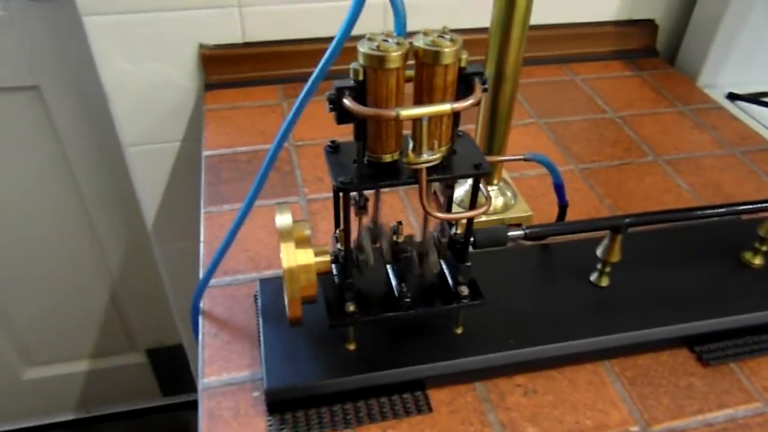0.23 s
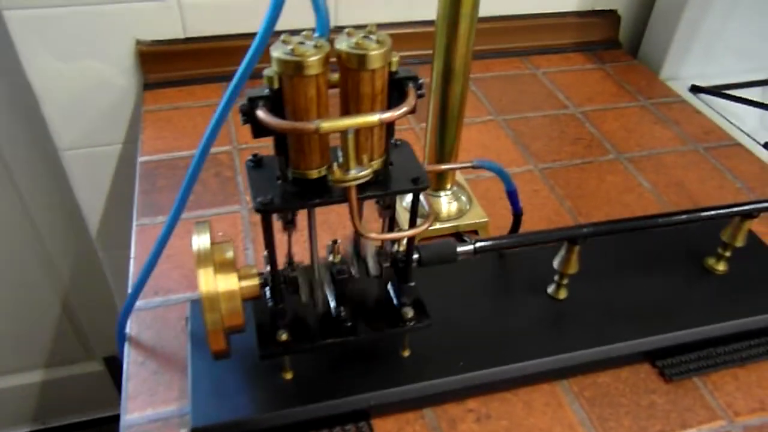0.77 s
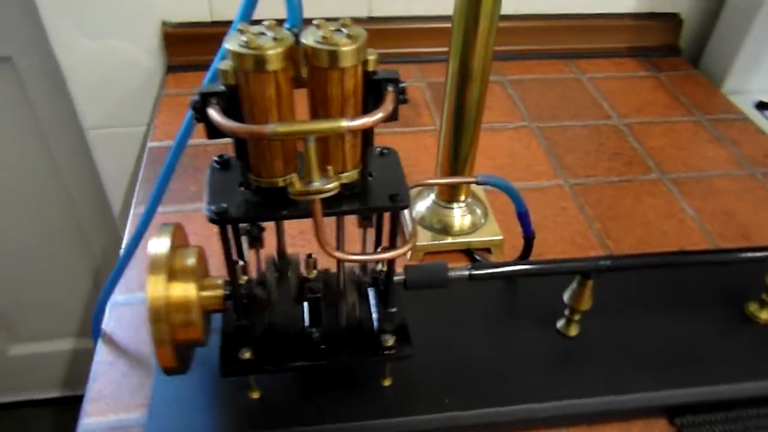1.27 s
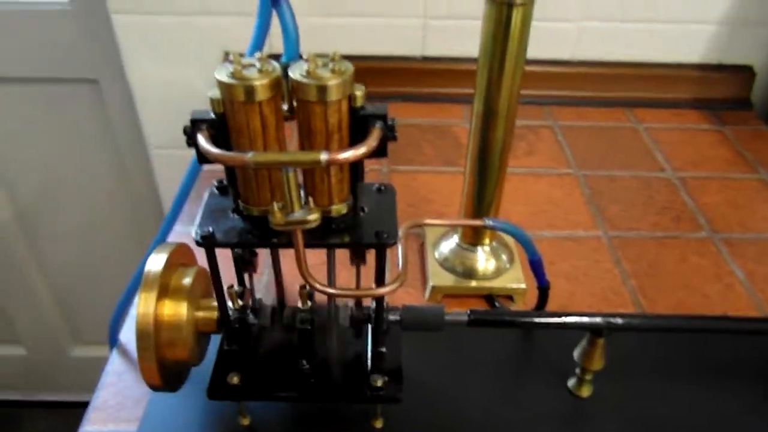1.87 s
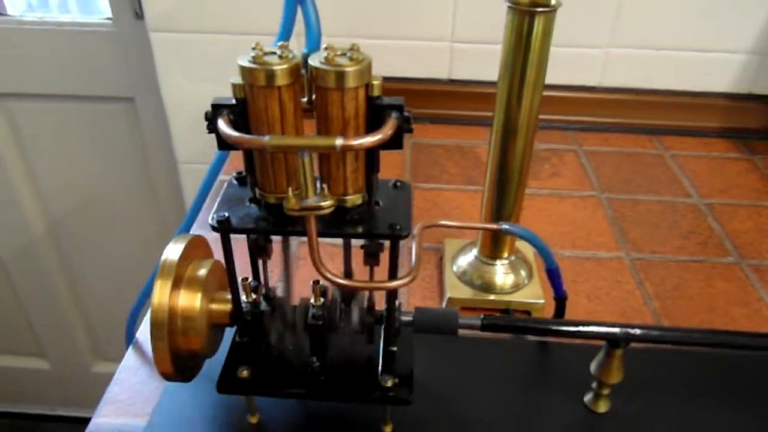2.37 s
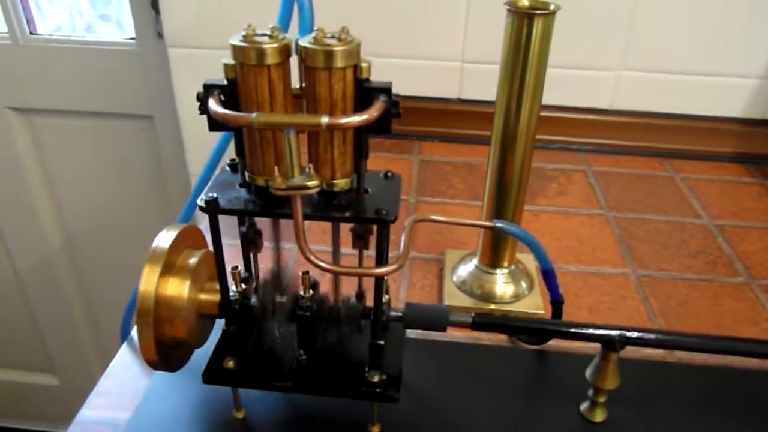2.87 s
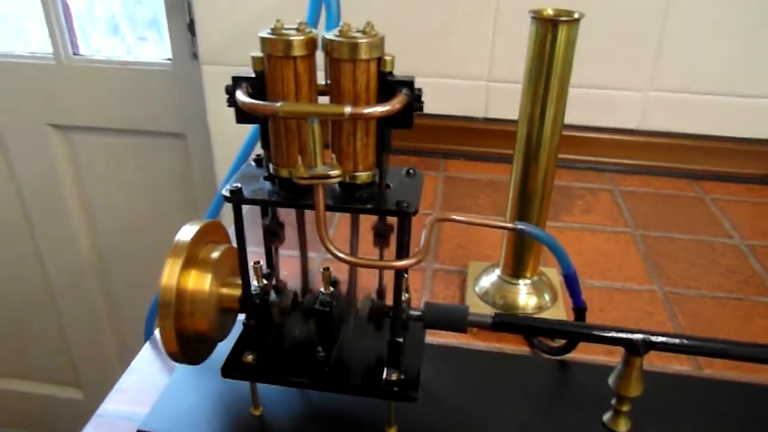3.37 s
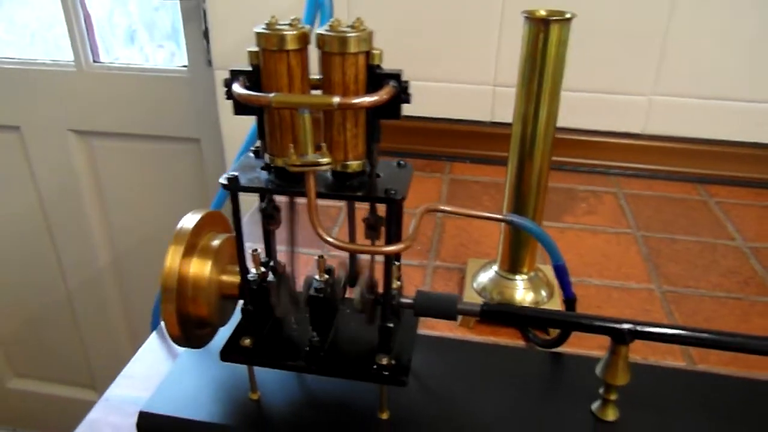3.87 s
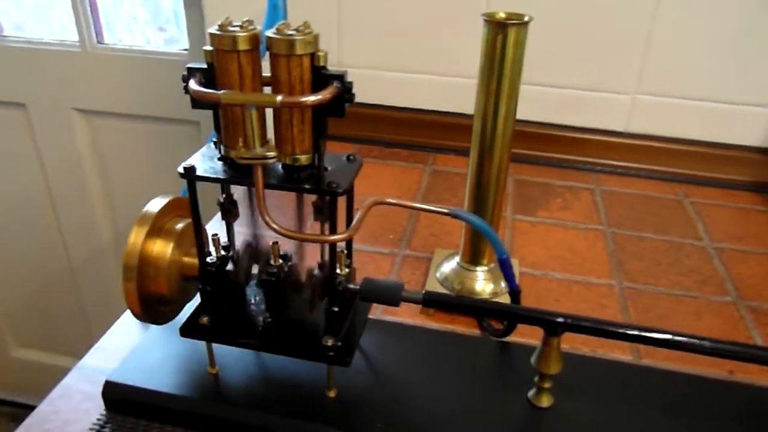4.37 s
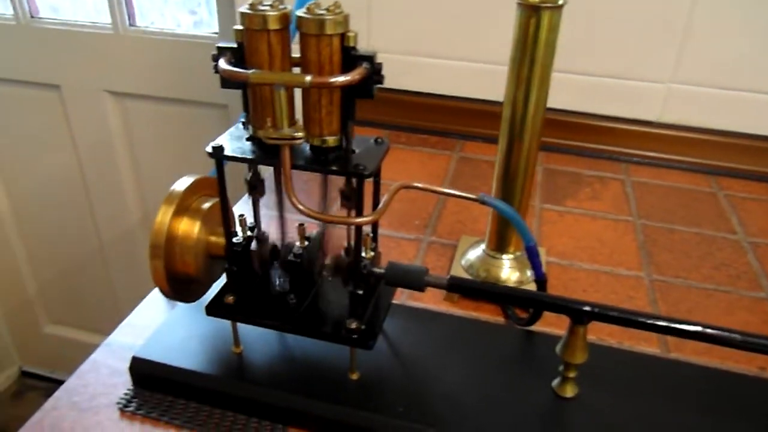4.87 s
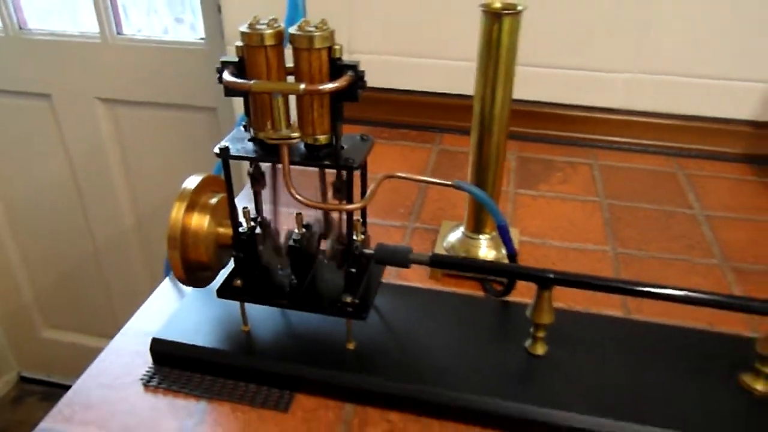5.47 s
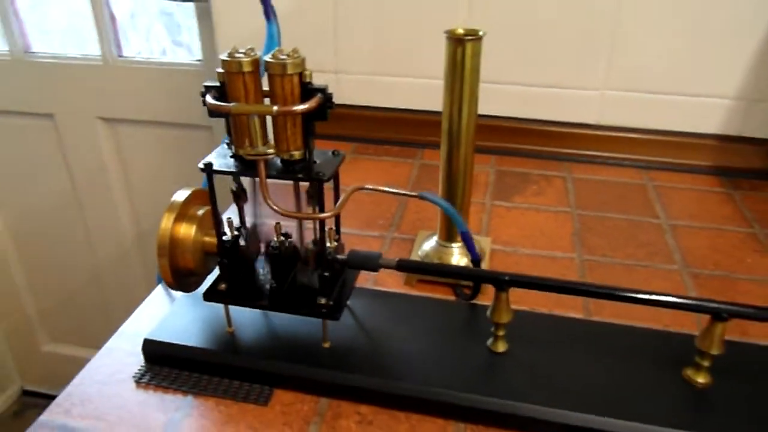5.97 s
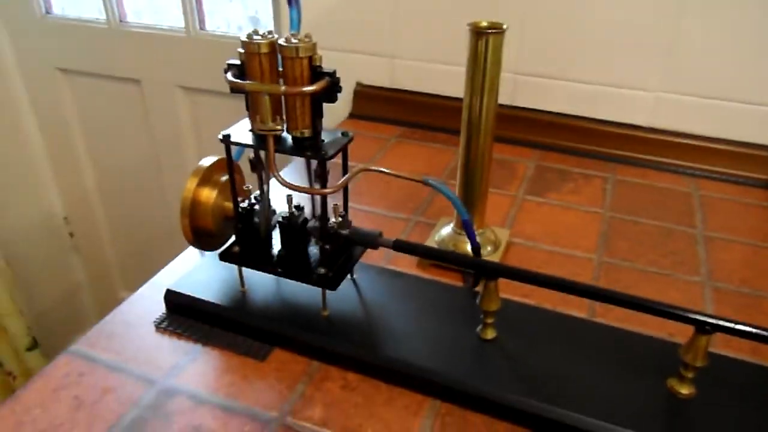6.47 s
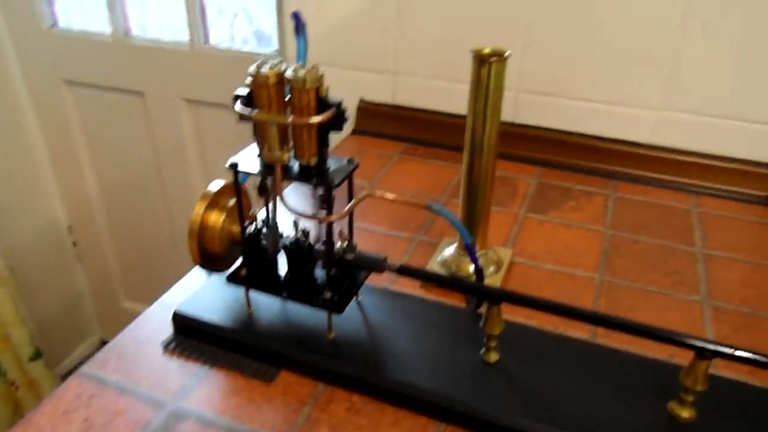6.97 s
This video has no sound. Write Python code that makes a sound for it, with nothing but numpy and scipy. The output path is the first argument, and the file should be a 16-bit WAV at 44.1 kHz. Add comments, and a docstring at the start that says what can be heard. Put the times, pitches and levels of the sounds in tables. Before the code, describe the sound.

A small model twin-cylinder engine rattles quickly and steadily, metallic knocks alternating with raspy, whistling air puffs, then sags briefly and picks up with a scrape.

```python
"""Small steam engine on a table

A model twin-cylinder steam engine runs on compressed air in a tiled room, close to a hand-held camera.
Once a turn the slack in its linkage rattles in a run of noise bursts, with fading sine rings and low pops.
Between the knocks the exhaust rasps, whistles and throbs: shaped noise, warbling tones and gliding puffs.
Near the end the engine slows, then picks up again with a light scrape of ringing noise."""
import sys
import numpy as np
from scipy import signal
from scipy.fft import rfft, irfft
from scipy.io import wavfile

SR = 44100
rng = np.random.default_rng(int(sys.argv[2]) if len(sys.argv) > 2 else 0)


def bounce(signal):
    """Save signal as a 16-bit WAV file at the path given by the first command-line argument."""
    frames = np.transpose(np.atleast_2d(signal))
    limited = np.clip(frames, -1, 1)
    pcm = np.round(limited * 32767).astype(np.int16)
    wavfile.write(sys.argv[1], SR, pcm)


N = 318402
TIME = np.arange(N) / SR
FULL_SPEED = 8.7  # turns per second

# Crank speed. Each row: time in seconds, speed in turns per second.
SPEED = [(0, 8.703), (2.1, 8.667), (4.3, 8.708), (5, 8.745), (5.6, 8.718), (5.8, 8.577), (6.13, 7.569),
         (6.4, 7.81), (7.22, 8.316)]
# Strength of the air flow. Each row: time in seconds, relative level in dB.
AIR_LEVEL = [(0, -25.4), (1, -25), (2.8, -25), (4.1, -26), (5.45, -25.5), (5.85, -27), (6.7, -27),
             (7.2, -25.5)]
# Tone colour of the metalwork, also used for the hiss. Each row: frequency in Hz, relative level in dB.
METAL = [(40, -27), (150, -11), (500, -14), (1100, -11), (1700, 4.5), (2200, 0), (2800, 0.5), (3900, -4.5),
         (4700, -4.5), (6500, 1.5), (9000, -2), (11500, -6.5)]


def gain_of(db):
    """Turns decibels into a factor."""
    return 10 ** (np.asarray(db) / 20)


def evened(x):
    """Scales a signal to an rms (average strength) of 1."""
    return x / np.sqrt(np.mean(x ** 2) + 1e-20)


def read(points, hz):
    """Reads a spectrum between its points on a log-frequency axis."""
    f, value = np.transpose(points)
    return np.interp(np.log(hz + 1), np.log(f + 1), value)


def curve(rows, column):
    """Joins one column of a table by straight lines in time."""
    rows = np.asarray(rows)
    return np.interp(TIME, rows[:, 0], rows[:, column])


def add(mix, s, sound):
    """Mixes a sound in at a time in seconds."""
    part = mix[max(round(s * SR), 0):][:len(sound)]
    part += sound[:len(part)]


def coloured(x, spectrum, rings=(), size=8192):
    """Passes x through a body of unit energy with a broad spectrum and ringing peaks."""
    hz = abs(np.fft.fftfreq(size, 1 / SR))
    db = read(spectrum, hz)
    for f, width, boost in rings:
        db = db + boost / (1 + (2 * (hz - f) / width) ** 2)
    # minimum phase: the body answers only after it is struck
    phased = np.exp(np.conj(signal.hilbert(np.log(gain_of(db)))))
    response = np.fft.ifft(phased).real[:size // 2]
    return signal.oaconvolve(x, response / np.linalg.norm(response))[:N]


def wander(rate_hz):
    """Smooth random movement with an rms of 1; a higher rate moves faster."""
    hz = np.fft.rfftfreq(N, 1 / SR)
    smooth = rfft(rng.standard_normal(N)) * np.exp(-(hz / rate_hz) ** 2)
    return evened(irfft(smooth, N))


def swell(t, peak_s):
    """A rise to 1 at peak_s and a fall after it."""
    return t / peak_s * np.exp(1 - t / peak_s)


def crank(first_knock_s=.0014):
    """Adds up the speed into turns made so far; each whole number is a knock."""
    return np.cumsum(curve(SPEED, 1)) / SR - first_knock_s * FULL_SPEED


def sag(s):
    """Turns per second below full speed at a time."""
    return FULL_SPEED - np.interp(s, *np.transpose(SPEED))


def passes(angle, share):
    """The times at which the crank passes one point of its turn."""
    return TIME[1:][np.diff(np.floor(angle - share)) > 0]


def knocking(angle, uneven_db=.5):
    """One knock a turn, each a little different: rows of seconds and dB."""
    # Strength of the knock before its chance part. Each row: time in seconds, relative level in dB.
    knock_level = [(0, -22), (.7, -20), (2, -20), (4.2, -20.5), (5.4, -22), (5.95, -24), (6.2, -21.5),
                   (7.2, -21.5)]
    s = passes(angle, 0)
    db = np.interp(s, *np.transpose(knock_level)) + uneven_db * rng.standard_normal(len(s))
    return np.column_stack([s, db])


def dispersed(x, delay_s=0.0005):
    """In metal the high bending waves outrun the low ones; delay_s is the travel time at 4 kHz."""
    hz = np.fft.rfftfreq(N, 1 / SR)
    return irfft(rfft(x) * np.exp(-4j * np.pi * delay_s * np.sqrt(4000 * hz)), N)


def rattle(angle, knocks, level_db=21.5, stretch=.05, jitter_s=.0001, ticks_db=-1,
           chatter=1.8, chatter_s=0.00059):
    """The linkage takes up its slack in a quick run of blows; the valve gear ticks in between."""
    # The blows within one knock. Each row: delay in seconds before chance shifts, relative level in dB.
    blow_rows = [(.0002, 2), (.0009, -3.5), (.0024, 3), (.0037, 7), (.0046, -1), (.006, -4), (.0081, 3.5),
                 (0.0107, -1)]
    # Valve gear ticks. Each row: share of a turn, relative level in dB.
    tick_rows = [(0.286, -5.5), (0.361, -6.5), (0.496, -5.5), (0.889, -11)]
    # Resonances of the struck metal. Each row: frequency in Hz, width in Hz, boost in dB.
    metal_rings = [(4544, 120, 11), (4980, 250, 10), (5884, 156, 7.5), (6290, 190, 4.5), (6700, 105, 9.5),
                   (8150, 330, 2), (10030, 680, 5.5)]
    blows, t = np.zeros(N), np.arange(SR // 200) / SR

    def strike(at, db):
        """Loose metal chatters for an instant after the first contact."""
        contact = rng.standard_normal(len(t)) * np.exp(-t / chatter_s)
        contact = chatter * contact / np.linalg.norm(contact)
        contact = contact + (t == 0)  # the first contact is a single click
        add(blows, at, gain_of(db) * contact / np.linalg.norm(contact))

    for s, knock_db in knocks:
        pace = 1 + stretch * rng.standard_normal()
        for delay, db in blow_rows:
            at = s + delay * pace + jitter_s * rng.standard_normal()
            strike(at, level_db + knock_db + db)
    for share, db in tick_rows:
        for at in passes(angle, share):
            strike(at, ticks_db + db)
    return dispersed(coloured(blows, METAL, metal_rings))


def frame(knocks, ring_db=-3, ring_s=0.0055, ring_spread=0.026,
          rebound_db=-5, rebound_s=.0075, rebound_drop=0.02,
          board_s=0.0027, board_spread=0.033, uneven_db=1.0, table_hz=212, table_s=0.005):
    """Each knock rings the frame, the baseboard and the table as swelling, fading sines."""
    # Low rings under each knock, changing over time; the table is weaker once the engine slows.
    # Each row: time in seconds, middle baseboard pitch in Hz,
    # baseboard level and table level in dB against the knock.
    board_rows = [(0, 510, -6, -18), (2, 510, -8.5, -18.5), (3.5, 507, -6, -18.5), (5.4, 508, -3.5, -18),
                  (6.1, 534, -4, -29), (7.2, 537, -1.5, -22)]
    # Middle pitch of the frame's ring. Each row: time in seconds, pitch in Hz.
    ring_pitch = [(0, 1692), (1.1, 1795), (2.3, 1737), (3.1, 1880), (3.6, 1793), (4.1, 1935), (5, 1883),
                  (6, 1750), (7.2, 1720)]
    out, t = np.zeros(N), np.arange(SR // 16) / SR
    when, *below = np.transpose(board_rows)
    for s, knock_db in knocks:
        board_hz, board_db, table_db = (np.interp(s, when, column) for column in below)
        board_hz *= 1 + board_spread * rng.standard_normal()
        board_db += uneven_db * rng.standard_normal()
        hz = np.interp(s, *np.transpose(ring_pitch)) * (1 + ring_spread * rng.standard_normal())
        ring = gain_of(ring_db) * swell(t, ring_s) * np.sin(2 * np.pi * (hz * t + rng.random()))
        board = gain_of(board_db) * swell(t, board_s) * np.sin(2 * np.pi * board_hz * t)
        table = gain_of(table_db) * swell(t, table_s) * np.sin(2 * np.pi * table_hz * t)
        add(out, s, gain_of(knock_db) * (ring + board + table))
        # the rebound rings a little lower, so each knock ends in a falling note
        low_hz = hz * (1 - rebound_drop)
        rebound = swell(t, ring_s) * np.sin(2 * np.pi * (low_hz * t + rng.random()))
        add(out, s + rebound_s, gain_of(knock_db + rebound_db) * rebound)
    return out


def pops(knocks, level_db=23, usual_db=-52, spread_db=9, sag_db=16, width_s=0.00011, delay_s=0.0039):
    """A short low pop follows each knock, mostly faint, fainter at low speed, now and then strong."""
    # Pops of set size, given to the nearest knock. Each row: time in seconds, relative level in dB.
    pop_rows = [(.69, -31.5), (.92, -41), (3.46, -36), (3.92, -31.5), (4.26, -29.5), (4.38, -40),
                (4.83, -39), (4.95, -37), (5.52, -39)]
    out, t, times = np.zeros(N), np.arange(SR // 100) / SR, knocks[:, 0]
    sizes_db = usual_db + spread_db * rng.uniform(-1.2, 1, len(times)) - sag_db * sag(times)
    for s, db in pop_rows:
        sizes_db[np.argmin(abs(times - s))] = db
    pulse = -np.exp(-((t - delay_s) / width_s) ** 2 / 2)
    for s, db in zip(times, sizes_db):
        add(out, s, gain_of(level_db + db) * pulse)
    return out


def port_flow(angle):
    """Rise of the air flow, in relative dB, as each port opens and shuts."""
    # Puffs of air in each turn. Each row: share of a turn, half width in turns, relative rise in dB.
    puff_rows = [(.1, 0.084, 2.5), (.425, 0.03, 5), (.61, 0.036, 4), (.79, 0.06, 5), (.92, 0.039, 3)]
    flow_db = np.zeros(N)
    for share, width, db in puff_rows:
        distance = (angle - share + .5) % 1 - .5  # turns from the middle of the puff
        flow_db += db * np.exp(-(distance / width) ** 2 / 2)
    return flow_db


def exhaust(angle, level_db=-0.21, port_depth=0.78, sputter_db=1.48, gust_db=1.0):
    """Air sputters through the ports as they open and shut, and resonates in the pipe."""
    # Tone colour of the exhaust. Each row: frequency in Hz, relative level in dB.
    exhaust_colour = [(70, -45.5), (150, -24), (320, -19.5), (480, -12), (800, -14), (1050, -11),
                      (1400, -10), (1700, -8), (2050, -6.5), (2700, -10), (3100, -11), (4500, -13),
                      (6500, -21), (11500, -21.5)]
    # Pipe resonances. Each row: frequency in Hz, width in Hz, boost in dB.
    pipe_rings = [(1214, 22, 4.8), (1350, 19, 12.6), (1614, 125, 11), (2387, 43, 10), (2697, 96, 11),
                  (2800, 31, 10.5)]
    flow_db = port_depth * port_flow(angle) + sputter_db * wander(280) + gust_db * wander(47)
    air = evened(gain_of(flow_db) * rng.standard_normal(N))
    return coloured(air * gain_of(curve(AIR_LEVEL, 1) + level_db), exhaust_colour, pipe_rings)


def whistle(angle, level_db=-7.5, centre_hz=2560, swing_hz=125, width_hz=90, steepness=2.36,
            gust_db=1.5, speed_power=4):
    """At full flow the ports break into fuzzy, warbling whistles; they fade when the engine slows."""
    flow_db = steepness * port_flow(angle) + gust_db * wander(32)
    speed = curve(SPEED, 1) / FULL_SPEED
    turn = 2 * np.pi * np.cumsum(centre_hz + swing_hz * wander(30.08)) / SR
    # two randomly changing strengths make the tone fuzzy
    tone = wander(width_hz) * np.cos(turn) + wander(width_hz) * np.sin(turn)
    whistles = evened(tone * gain_of(flow_db) * speed ** speed_power)
    return whistles * gain_of(curve(AIR_LEVEL, 1) + level_db)


def leak(angle, level_db=-11, widest=0.12, depth=1.0):
    """A thin hiss escapes at the glands, widest at one point of each turn."""
    opening = 1 + depth * np.cos(2 * np.pi * (angle - widest))
    hiss = rng.standard_normal(N) * opening * gain_of(curve(AIR_LEVEL, 1) + level_db)
    return coloured(hiss, METAL)


def hum(waver=0.34):
    """Faint steady tones under the knocking waver a little in strength and phase."""
    # The tones. Each row: frequency in Hz, relative level in dB.
    tone_rows = [(209, -58), (388, -58), (630, -59.5), (705, -60), (728, -54), (753, -52.5), (777, -54),
                 (801, -55), (1216, -57)]
    # How the tones rise and fall together. Each row: time in seconds, change in dB.
    tone_level = [(0, 1.5), (3, -0.5), (5.5, 2), (6.2, 0), (7.2, -12)]
    out = np.zeros(N)
    for hz, db in tone_rows:
        size, drift = wander(3), wander(3)
        tone = np.sin(2 * np.pi * hz * TIME + waver * drift)
        out += gain_of(db) * np.sqrt(2) * (1 + waver * size) * tone
    return out * gain_of(curve(tone_level, 1))


def rumble():
    """Soft low handling noise of the hand-held camera, at one microphone."""
    # Strength of the rumble. Each row: time in seconds, level in dB.
    rumble_level = [(0, -58), (1.8, -59), (3.4, -66), (5.8, -64), (7.2, -66)]
    # Tone colour of the rumble. Each row: frequency in Hz, relative level in dB.
    rumble_colour = [(15, -3), (48, 3), (70, -12), (120, -9), (300, -19), (1000, -68)]
    return coloured(rng.standard_normal(N), rumble_colour) * gain_of(curve(rumble_level, 1))


def throb(angle, opens=0.34, pipe_hz=129, glide_hz_per_s=280, rise_s=0.0013, length_s=0.042,
          level_db=-37, sag_db=3.0, uneven_db=0.85, overtone=0.16):
    """The exhaust valve's puff swings in the long pipe, rising a little in pitch; weaker at low speed."""
    openings = np.diff(np.floor(angle - opens), prepend=np.floor(-opens))
    puffs = openings * gain_of(level_db - sag_db * sag(TIME) + uneven_db * wander(7.7))
    t = np.arange(SR // 12) / SR
    turn = 2 * np.pi * np.cumsum(pipe_hz + glide_hz_per_s * t) / SR
    shape = (1 - np.exp(-(t / rise_s) ** 2)) * np.exp(-(t / length_s) ** 4)
    swing = -(np.sin(turn) + overtone * np.sin(2 * turn)) * shape
    return signal.oaconvolve(puffs, swing)[:N]


def chuff(angle, level_db=-43, widest=.41, width=0.058, sag_db=5):
    """A dull rush of air leaves the pipe early in each throb."""
    # Tone colour of the rush. Each row: frequency in Hz, relative level in dB.
    chuff_colour = [(50, -21), (130, -9), (230, 1), (330, -2.5), (700, -26), (3000, -57)]
    opening = np.exp(-((angle % 1 - widest) / width) ** 2 / 2)
    rush = rng.standard_normal(N) * opening * gain_of(level_db - sag_db * sag(TIME))
    return coloured(rush, chuff_colour)


def drone(hz=45, level_db=-59, start_s=0.44, end_s=3.15, fade_s=.15, waver=.25):
    """A faint deep sine sounds for a few seconds, wavering a little."""
    gate = np.clip(np.minimum(TIME - start_s, end_s - TIME) / fade_s + .5, 0, 1)
    size = 1 + waver * wander(4)
    tone = np.sqrt(2) * np.sin(2 * np.pi * hz * TIME + waver * wander(4))
    return gain_of(level_db) * gate * size * tone


def scrape(angle, touches=0.96, depth_db=7, grain_db=2):
    """The shaft rubs during part of each turn: noise through a ringing body."""
    # Strength of the scrape. Each row: time in seconds, relative level in dB.
    scrape_level = [(6.3, -50), (6.62, -36), (6.76, -19), (6.88, -24.5), (7.0, -24.5), (7.12, -26.5),
                    (7.22, -21)]
    # Tone colour of the scrape. Each row: frequency in Hz, relative level in dB.
    scrape_colour = [(200, -25), (800, -15), (1100, -4), (1500, -6.5), (1900, -11.5), (4000, -10.5),
                     (11000, -43)]
    # Resonances of the scrape. Each row: frequency in Hz, width in Hz, boost in dB.
    scrape_rings = [(1110, 56, 5), (1410, 64, 9.5), (1572, 55, 21.5)]
    pressure_db = depth_db * (np.cos(2 * np.pi * (angle - touches)) - 1) + grain_db * wander(250)
    rub = rng.standard_normal(N) * gain_of(curve(scrape_level, 1) + pressure_db)
    return coloured(rub, scrape_colour, scrape_rings)


def ports(x, lag_s=.00003):
    """The engine reaches the left microphone slightly later, and each has its own colour."""
    # The microphone pair. Each row: frequency in Hz, left minus right in dB.
    balance_db = [(100, -1.5), (2000, -1), (3700, -1), (5200, 1.5), (6700, 3), (8400, 1.5), (9700, -6.5),
                  (11300, -2)]
    hz = np.fft.rfftfreq(N, 1 / SR)
    half = gain_of(read(balance_db, hz) / 2) * np.exp(-1j * np.pi * hz * lag_s)
    return irfft(rfft(x) * np.array([half, 1 / half]), N)


def scattered(x, level_db=-6, fade_s=0.0017, count=6):
    """Treble bounces off chimney and baseboard to each microphone; paths change as the camera moves."""
    t = np.arange(SR // 100) / SR
    treble = signal.butter(2, 3500, "highpass", fs=SR, output="sos")
    taps = signal.sosfilt(treble, rng.standard_normal((count, 2, len(t))) * swell(t, fade_s))
    taps /= np.linalg.norm(taps, axis=2, keepdims=True)
    place = np.linspace(0, count - 1, N)
    out = np.zeros((2, N))
    for k, paths in enumerate(taps):
        # each set of paths fades smoothly into the next
        nearness = np.cos(np.pi / 2 * np.clip(place - k, -1, 1))
        out += nearness * signal.oaconvolve(x[None], paths, axes=1)[:, :N]
    return gain_of(level_db) * out


def room(x, wet_db=-11, gap_s=0.008):
    """Dense reflections from tiles and walls; mostly the bass is shared by both microphones."""
    # How long echoes last. Each row: frequency in Hz, time to fall by 60 dB in seconds.
    echo_times = [(125, 0.35), (500, 0.29), (2000, 0.19), (6000, 0.45), (12000, 0.21)]
    taps = rng.standard_normal((3, SR // 2)) * (np.arange(SR // 2) > gap_s * SR)
    hz, t, z = signal.stft(taps, SR, nperseg=256)
    same = .4 / (1 + (hz[:, None] / 2500) ** 2)  # share of energy common to both sides
    z = np.sqrt(same) * z[0] + np.sqrt(1 - same) * z[1:]
    z = z * gain_of(-60 * t / read(echo_times, hz)[:, None])
    tail = signal.istft(z, SR, nperseg=256)[1]
    tail = tail / np.linalg.norm(tail[0])
    return gain_of(wet_db) * signal.fftconvolve(x[None], tail, axes=1)[:, :N]


def scene():
    """The engine's sounds follow the crank; the thin hiss and the rumble differ at the two microphones."""
    angle = crank()
    knocks = knocking(angle)
    metal = rattle(angle, knocks)
    air = exhaust(angle) + whistle(angle) + throb(angle) + chuff(angle)
    engine = metal + frame(knocks) + pops(knocks) + air + scrape(angle)
    diffuse = np.array([leak(angle) + rumble() for _ in range(2)])
    direct = ports(engine + hum() + drone())
    return direct + scattered(metal) + room(engine) + diffuse


def record(dry, edge_hz=11600):
    """Clips peaks beyond full scale, then removes the treble above edge_hz."""
    edge = signal.firwin(511, edge_hz, window=("kaiser", 8), fs=SR)
    return signal.oaconvolve(np.clip(dry, -1, 1), edge[None], "same", axes=1)


dry = scene()
out = record(dry)
bounce(out)
```